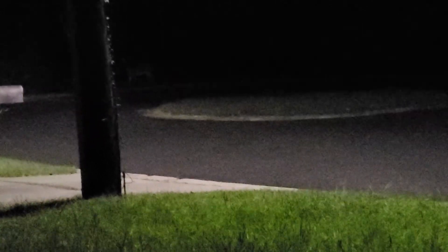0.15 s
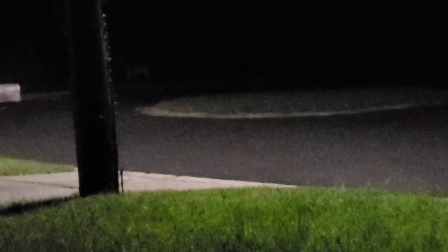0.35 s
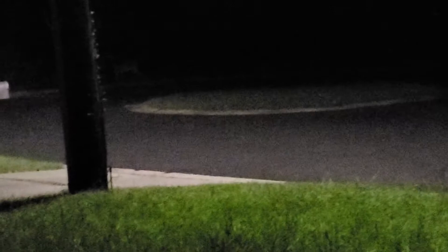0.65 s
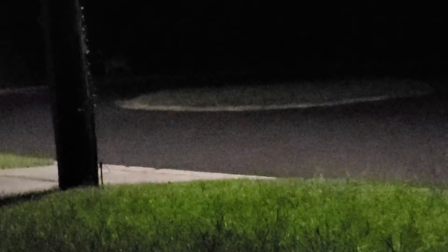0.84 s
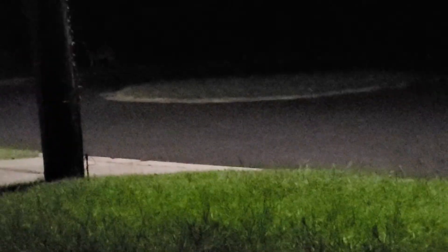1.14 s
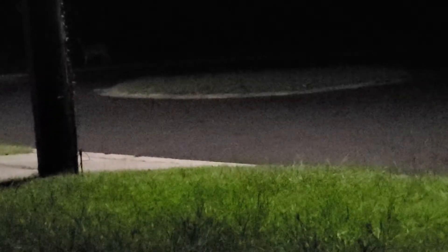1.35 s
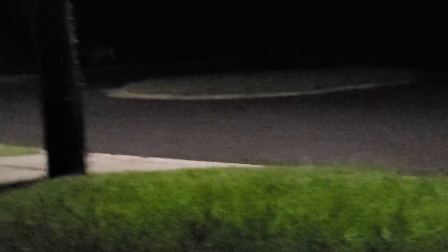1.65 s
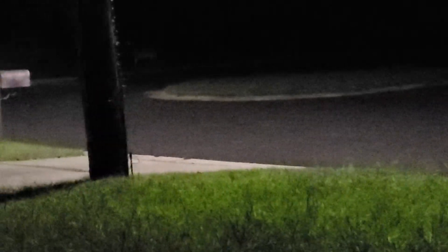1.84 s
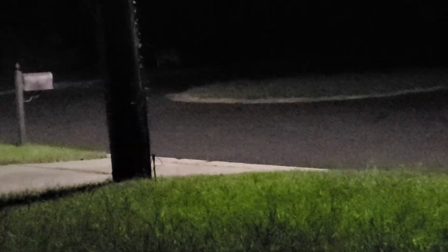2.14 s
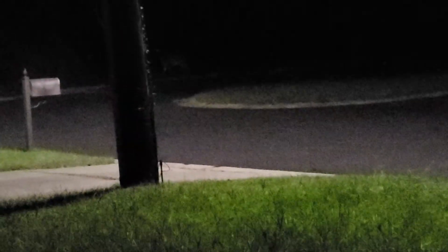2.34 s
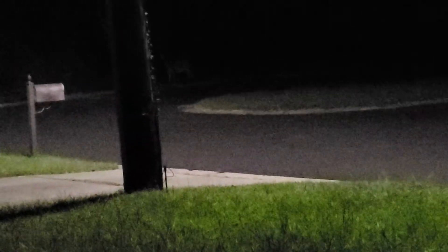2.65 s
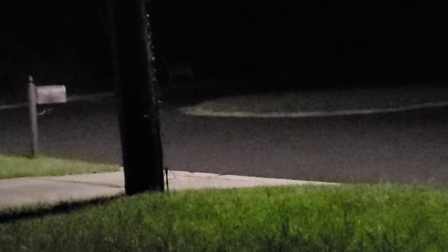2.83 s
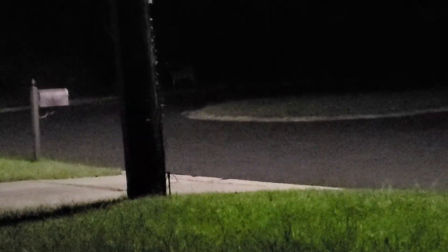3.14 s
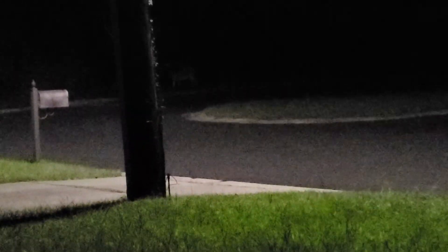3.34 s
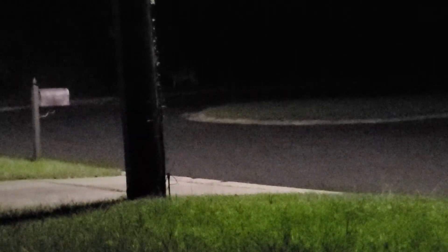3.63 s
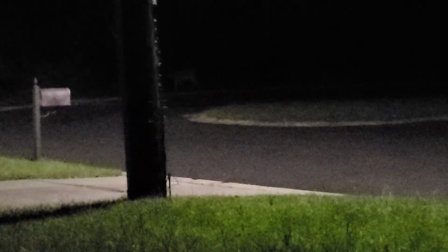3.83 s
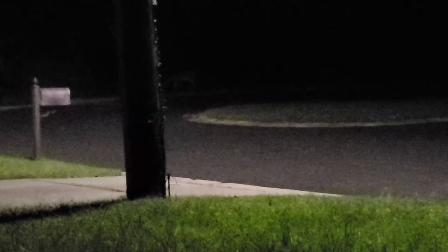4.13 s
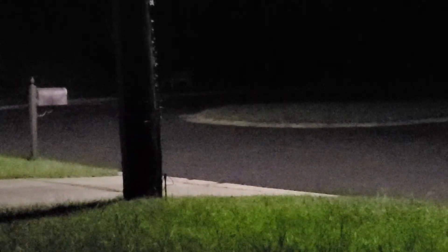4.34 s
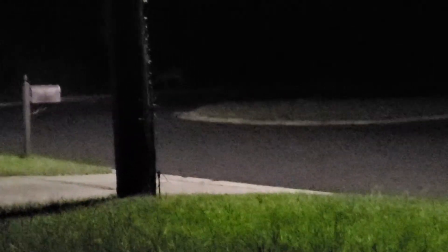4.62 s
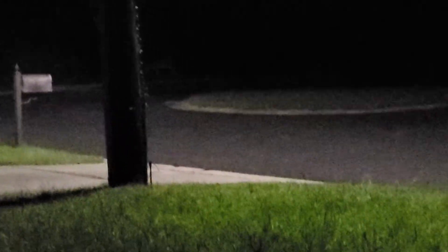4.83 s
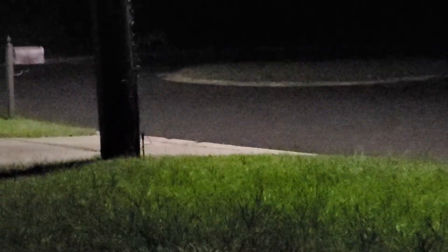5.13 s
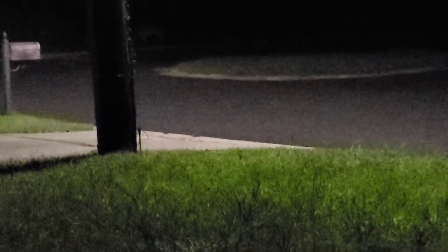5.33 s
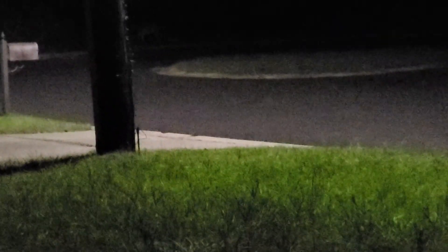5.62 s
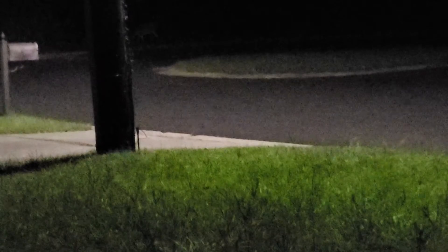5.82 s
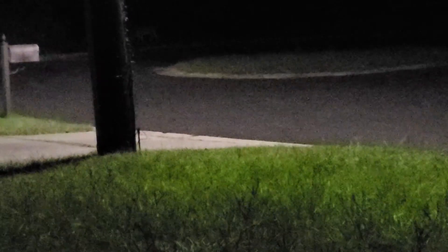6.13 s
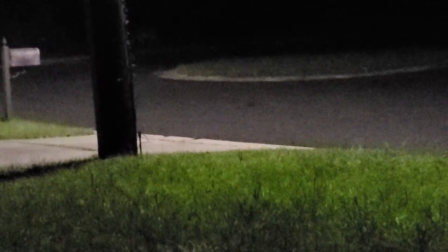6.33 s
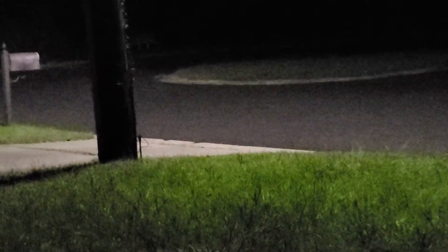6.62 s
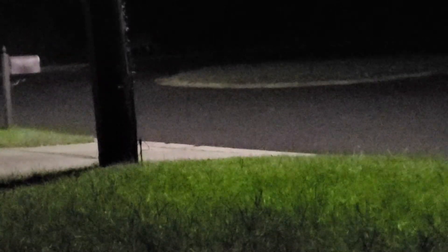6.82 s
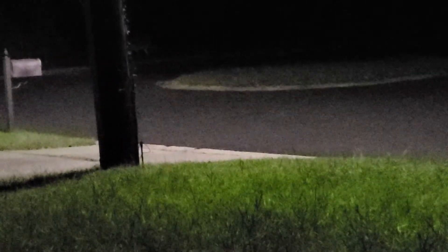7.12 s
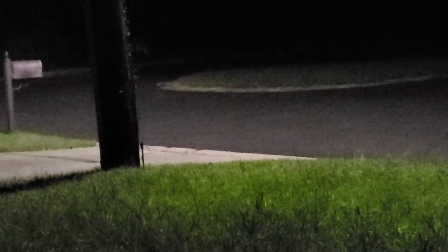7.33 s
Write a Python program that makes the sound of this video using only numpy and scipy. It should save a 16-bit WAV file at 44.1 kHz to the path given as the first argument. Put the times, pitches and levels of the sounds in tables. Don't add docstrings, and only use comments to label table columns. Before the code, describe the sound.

On a lawn beside a quiet street at night, cricket choirs trill continuously over far traffic, fan hum and soft hiss. A meadow katydid ticks and buzzes at left early on. Fingers click the camera near the start and knock it later. A tree katydid rasps in pairs throughout, and a close one bursts out late. Handheld stereo microphones.

```python
import sys
import numpy as np
from scipy import signal
from scipy.fft import rfft, irfft, next_fast_len
from scipy.io import wavfile
from scipy.ndimage import map_coordinates

SR = 44100
rng = np.random.default_rng(int(sys.argv[2]) if len(sys.argv) > 2 else 0)


def makeup_ratio(level_db):
    decades = np.asarray(level_db, float) / 20
    return 10 ** decades


def waveform_to_disk(signal):
    frames = np.transpose(np.atleast_2d(signal))
    scaled = np.clip(frames, -1, 1) * 32767
    samples = np.round(scaled).astype(np.int16)
    wavfile.write(sys.argv[1], SR, samples)


N = 329427

# centre_hz, width_hz, level_db
MEADOW_MODES = [(13600, 3000, 3), (15440, 5800, 10)]


def unit(x):
    return x / np.sqrt(np.mean(x ** 2) + 1e-20)


def along(points, hz):
    f, v = np.transpose(points)
    return np.interp(np.log(hz + 1), np.log(f + 1), v)


def wobble(rate):
    return map_coordinates(rng.standard_normal(400), [np.arange(N) * rate / SR], mode="mirror")


def swells(rows):
    t = np.arange(N) / SR
    return sum(np.outer(gains_db, np.exp(-((t - s) / half) ** 2)) for s, half, *gains_db in rows)


def filtered(x, response):
    m = next_fast_len(N + SR // 2)
    return irfft(rfft(x, m) * response(np.fft.rfftfreq(m, 1 / SR)), m)[..., :N]


def sides(left_right_db):
    return makeup_ratio([[left_right_db / 2], [-left_right_db / 2]])


def wing(x, modes):
    def resonance(f, centre, width):
        return f * width / np.hypot(centre * centre - f * f, f * width)

    def response(f):
        return np.sqrt(sum(makeup_ratio(2 * db) * resonance(f, c, w) ** 4.88 for c, w, db in modes))

    return filtered(x, response)


def crowd(voice, modes, count, spread):
    db, left_right_db, rate, swell_db, blur_db = voice
    period = 1 / (rate * np.exp(spread * rng.standard_normal((count, 1))))
    jitter = .012 * rng.standard_normal((count, 1500))
    times = period * (np.arange(1500) + rng.random((count, 1)) + jitter)
    knots = rng.standard_normal((count, 400))
    singer = np.broadcast_to(np.arange(count)[:, None], times.shape)
    size = makeup_ratio(swell_db * map_coordinates(knots, [singer, times * 7], order=1, mode="mirror"))
    lags_s = .0005 * rng.random((2, count, 1))
    gains = makeup_ratio(1.7 * rng.standard_normal((2, count, 1)))
    ears = []
    for lag, gain in zip(lags_s, gains):
        samples = np.abs(np.int64((times + lag) * SR))
        ears.append(unit(np.bincount(samples.ravel(), (size * gain).ravel(), N)[:N]))
    blur = makeup_ratio(blur_db + 0.88 * wobble(11)) * rng.standard_normal((2, N))
    return makeup_ratio(db) * sides(left_right_db) * unit(wing(np.array(ears) + blur, modes))


def scrape(modes, grit_db, alike):
    teeth = rng.standard_normal((3, N)) * makeup_ratio(grit_db * rng.standard_normal(N))
    ears = alike * teeth[0] + np.sqrt(np.abs(1 - alike ** 2)) * teeth[1:]
    return unit(wing(ears, modes))


def strokes(rows, rise, fall):
    t = np.arange(N) / SR
    return sum(makeup_ratio(db) * np.exp(-((t - s) / np.where(t < s, rise, fall)) ** 2) for s, db in rows)


def echoes(level, echo_db, t60):
    keep = makeup_ratio(-120 / (t60 * SR))
    tail = signal.lfilter([1 - keep], [1, -keep], level ** 2)
    return np.sqrt(level ** 2 + makeup_ratio(2 * echo_db) * tail)


def rush(spectrum, alike, lag):
    def mid_side(hz):
        turn = np.arccos(np.clip(along(alike, hz), -1, 1)) / 2
        return makeup_ratio(along(spectrum, hz)) * np.array([np.cos(turn), np.sin(turn)])

    mid, side = filtered(rng.standard_normal((2, N)), mid_side)
    ears = np.array([mid + side, mid - side])
    return unit(filtered(ears, lambda hz: np.exp(-1j * np.pi * lag * np.outer([1, -1], hz))))


def low_choir():
    # level_db, left_right_db, pulses_per_s, swell_db, far_blur_db
    voice = (-50.5, -4.5, 48, 1, 0.5)
    # centre_hz, width_hz, level_db
    modes = [(2812, 198, 16.5), (3024, 120, 4.5)]
    # peak_s, half_length_s, gain_db
    gatherings = [
        (.35, .35, 2),
        (1.65, .3, 1),
        (4.25, 0.44, 2),
        (5.15, 0.14, 2),
        (6.3, .8, 1),
    ]
    gain_db, = swells(gatherings)
    return makeup_ratio(gain_db - gain_db.mean() + 1.1 * wobble(6)) * crowd(voice, modes, count=12, spread=.25)


def high_choir():
    # level_db, left_right_db, pulses_per_s, swell_db, far_blur_db
    voice = (-48, -1.7, 70, 2.5, 0.5)
    # centre_hz, width_hz, level_db
    modes = [(5351, 533, 17), (5044, 450, 7.7)]
    period_s, crest_s, swell_db = 0.548, 2.107, 1.1
    gain_db = swell_db * np.cos(2 * np.pi * (np.arange(N) / SR - crest_s) / period_s)
    return makeup_ratio(gain_db) * crowd(voice, modes, count=20, spread=.3)


def faint_singers():
    # level_db, left_right_db, pulses_per_s, swell_db, far_blur_db
    thin_voice = (-60, 4.5, 89.5, -2, 6.5)
    conehead_voice = (-65, 4.5, 61, -2, 6)
    solo_voice = (-66.5, 3.5, 64, 3, 3)
    # centre_hz, width_hz, level_db
    thin_modes = [(6350, 390, 1), (6450, 490, 2), (6820, 370, 3.5)]
    conehead_modes = [(8650, 760, 1.5), (9250, 260, 2), (9020, 940, 2.5), (9770, 230, 4)]
    solo_modes = [(2395, 92, .1)]
    thin = crowd(thin_voice, thin_modes, count=20, spread=.3)
    coneheads = crowd(conehead_voice, conehead_modes, count=4, spread=0.022)
    return thin + coneheads + crowd(solo_voice, solo_modes, count=1, spread=0)


def meadow():
    # start_s, end_s, level_db
    spells = [
        (-.2, 1.82, -72),
        (-.2, 3.72, -78.5),
        (6.98, 7.3, -84),
    ]
    far_db, fade_s = -80.5, .12
    t = np.arange(N) / SR
    power = makeup_ratio(2 * far_db)
    for start, end, db in spells:
        singing = np.clip(np.minimum(t - start, end - t) / fade_s + .5, 0, 1)
        power = power + makeup_ratio(2 * db) * singing ** 2
    first_s, gap_s, crest_s, crest_db, sag_db_per_s = 0.065, 0.094, .47, -52, 26.5
    ticks = [(s, crest_db - sag_db_per_s * abs(s - crest_s)) for s in first_s + gap_s * np.arange(6)]
    beat = (.5 + .5 * np.cos(2 * np.pi * 31.9 * (t - 1.338))) ** 2.2
    buzzing = np.clip((t - .8) / 0.44, 0, 1) * np.clip((1.86 - t) / .1, 0, 1)
    gate = 1 + 1.4 * buzzing * (beat - .3) + .25 * buzzing
    level = np.sqrt(power) * makeup_ratio(1.1 * wobble(9)) * gate
    level = level + makeup_ratio(-17) * strokes(ticks, rise=0.0082, fall=.014)
    return sides(20.6) * makeup_ratio(2.5) * level * scrape(MEADOW_MODES, grit_db=-3.0, alike=0.33)


def traffic(rumble_db):
    # freq_hz, density_db
    spectrum = [(13, -47), (22, -19), (37, -18.5), (54, 5), (68, 1), (97, -6), (110, -14), (140, -32),
                (240, -120)]
    level = makeup_ratio(-45.57 + rumble_db + 1.1 * wobble(13))
    return sides(2.2) * level * rush(spectrum, [(40, 0.94), (100, 0.9)], lag=0.00013)


def fan(hum_db):
    # freq_hz, density_db
    spectrum = [(59, -11.5), (100, -6), (129, -2.5), (145, -2.5), (184, -2), (280, -21), (360, -33),
                (620, -120)]
    blade_hz, blade_db, grows_db_per_s = 138.5, -44, 0.27
    gain_db = hum_db + grows_db_per_s * np.arange(N) / SR
    phase = 2 * np.pi * np.cumsum(blade_hz + 1.49 * wobble(6)) / SR
    blade = makeup_ratio(blade_db + 2.5 * wobble(5.4)) * np.sin(phase)
    noise = rush(spectrum, [(100, 0.96), (140, 0.94), (250, 0.98)], lag=-0.000055)
    return makeup_ratio(gain_db - gain_db.mean()) * (makeup_ratio(-43.5) * sides(.6) * noise + blade)


def murmur(murmur_db):
    # freq_hz, density_db
    spectrum = [(140, -25), (230, -3.5), (318, -7.5), (359, -5.5), (394, -5.5), (513, -3.5), (609, -9),
                (731, -7), (962, -16), (1060, -15.5), (1700, -21), (2120, -24), (2600, -19.5),
                (3380, -26.5), (5720, -120)]
    # freq_hz, likeness
    alike = [(250, 1), (500, 0.76), (700, 0.026), (1300, 0.23), (2200, 1)]
    # freq_hz, left_right_db
    balance = [(250, 2.5), (500, 2.5), (770, -1.2), (1200, 2.5), (2000, 1)]
    noise = rush(spectrum, alike, lag=0.00039)
    noise = filtered(noise, lambda f: makeup_ratio(np.outer([.5, -.5], along(balance, f))))
    return makeup_ratio(-50 + murmur_db + 0.94 * wobble(7)) * noise


def hiss():
    # freq_hz, density_db
    spectrum = [(2000, 17.5), (3700, -43), (7500, -32), (10500, 4), (16000, -16)]
    tilt = [(1500, 9.0), (8000, -19.0), (12000, 10.5)]  # freq_hz, left_gain_db (right is opposite)
    noise = rush(spectrum, [(2000, .1)], lag=0)
    return makeup_ratio(-70.5) * filtered(noise, lambda f: makeup_ratio(np.outer([1, -1], along(tilt, f))) * (f > 1500))


def drone():
    # peak_s, half_length_s, rumble_gain_db, hum_gain_db, murmur_gain_db
    passes = [
        (1.7, 0.43, 1.1, 0.81, -0.5),
        (3.2, 0.27, 2, 1.5, .5),
        (3.7, 0.2, .5, 1.4, 2),
        (4.5, 0.5, 2.1, 0.73, 1.5),
        (5.35, 0.32, 1.6, 0.67, 1.5),
        (6.3, 0.69, 1.1, 3.4, .5),
        (7.35, .3, 4, .1, .1),
    ]
    rumble_db, hum_db, murmur_db = swells(passes)
    return traffic(rumble_db) + fan(hum_db) + murmur(murmur_db) + hiss()


def knocks():
    # start_s, level_db, pitch_hz, t60_s, left_lag_s
    taps = [
        (5.346, -28, 705, 0.015, .0001),
        (5.348, -38, 1150, .01, .0001),
        (5.532, -29.5, 620, 0.01, .0001),
        (5.594, -35, 800, 0.0079, .0001),
        (0.131, -28.5, 606, 0.0095, .0001),
        (6.4335, -26, 172, 0.025, .0001),
        (6.855, -49, 1150, 0.11, .0001),
        (6.856, -45, 2050, 0.022, .0001),
    ]
    # delay_s, level_db, pitch_hz, t60_s, left_lag_s
    shell = [
        (0, -13.5, 2300, .0045, .00045),
        (.0005, -18, 1200, .008, .0004),
        (0, -15, 4600, .003, .00025),
        (.0001, -21, 3100, .004, .0004),
    ]
    snap_s = .58922
    out = np.zeros((2, N + SR))
    for s, db, hz, t60, lag in taps + [(snap_s + delay, *ring) for delay, *ring in shell]:
        first = int(s * SR)
        t = np.maximum((first + np.arange(SR // 4)) / SR - s - np.array([[lag], [0]]), 0)
        envelope = makeup_ratio(db - 60 * t / t60) * (1 - np.exp(-3 * hz * t))
        out[:, first:first + SR // 4] -= envelope * np.sin(2 * np.pi * hz * t)
    return out[:, :N]


def tree_katydid():
    # peak_s, level_db
    calls = [
        (0.692, -49),
        (1.63, -47),
        (2.529, -47.5),
        (3.515, -47),
        (4.26, -46.5),
        (5.128, -48),
        (6.045, -47),
        (7.068, -48),
    ]
    # centre_hz, width_hz, level_db
    modes = [(2190, 400, 4), (3060, 710, 4), (4510, 1170, 0.5)]
    gap_s, second_db = 0.13, -0.5
    lone = (5.555, -52)  # peak_s, level_db
    pairs = calls + [(s + gap_s, db + second_db) for s, db in calls] + [lone]
    level = echoes(strokes(pairs, rise=0.054, fall=0.025), echo_db=-3.5, t60=0.72)
    return sides(-4) * makeup_ratio(-5.0) * level * scrape(modes, grit_db=3, alike=0.53)


def far_katydid():
    # peak_s, level_db
    calls = [(2.51, -64), (2.638, -62), (3.484, -65), (3.603, -63), (4.234, -64), (4.371, -64),
             (5.097, -63), (5.259, -63), (7.069, -64), (7.18, -62), (7.287, -67), (7.384, -68)]
    level = echoes(strokes(calls, rise=0.048, fall=0.049), echo_db=-3, t60=0.43)
    return sides(20.5) * makeup_ratio(-6.0) * level * scrape(MEADOW_MODES, grit_db=3.0, alike=.3)


def chips():
    # centre_s, level_db, pitch_hz, length_s
    chirps = [
        (3.803, -50.5, 3090, 0.022),
        (3.834, -57, 3160, 0.026),
        (5.882, -46, 3180, 0.02),
        (5.932, -53, 3110, 0.02),
    ]
    t = np.arange(N) / SR
    tone = np.zeros(N)
    for s, db, hz, length in chirps:
        tone += makeup_ratio(db) * np.exp(-((t - s) / (length / 2)) ** 4) * np.sin(2 * np.pi * hz * t)
    return sides(-16) * tone


def whine():
    pitch_hz, level_db, start_s = 658, -61, 5.04
    fade = np.clip(np.arange(N) / SR - start_s, 0, 1)
    phase = 2 * np.pi * np.cumsum(pitch_hz + 4 * wobble(8)) / SR
    return fade * makeup_ratio(level_db + 3.0 * wobble(4.9)) * np.sin(phase)


def near_katydid():
    # peak_s, level_db
    strays = [
        (5.764, -63),
        (6.634, -77),
    ]
    # centre_hz, width_hz, level_db
    modes = [(8200, 2000, 11), (10800, 2500, 11), (12900, 1800, 7), (15000, 2200, 4)]
    first_s, period_s, burst_db = 5.992, 0.0677, -51
    burst = [(first_s + k * period_s, burst_db) for k in range(6)] + strays
    level = echoes(strokes(burst, rise=0.019, fall=0.012), echo_db=1.0, t60=0.36)
    rasp = makeup_ratio(-5.0) * level * scrape(modes, grit_db=-2, alike=0.34)
    shade = [(8000, 1.2), (11000, 4.3), (14000, 7.6)]  # freq_hz, left_gain_db (right is opposite)
    return filtered(rasp, lambda hz: makeup_ratio(np.outer([1, -1], along(shade, hz))))


def scene():
    choirs = low_choir() + high_choir() + faint_singers()
    katydids = tree_katydid() + far_katydid() + near_katydid()
    return choirs + meadow() + drone() + knocks() + katydids + chips() + whine()


def roll_off(x):
    return signal.sosfilt(signal.butter(12, 15790, fs=SR, output="sos"), x)


def record(dry):
    return roll_off(dry)


dry = scene()
out = record(dry)
waveform_to_disk(out)
```